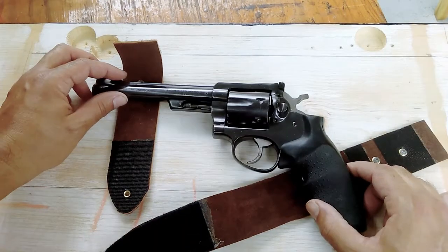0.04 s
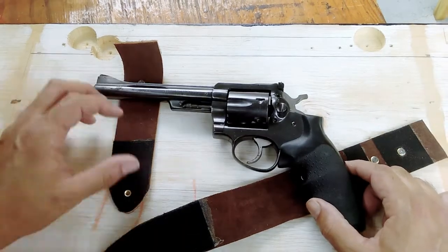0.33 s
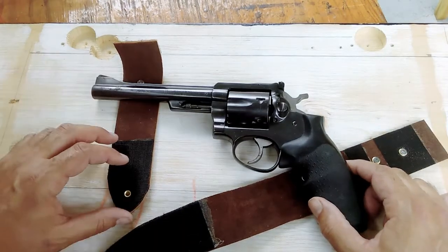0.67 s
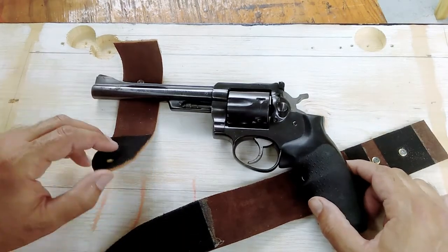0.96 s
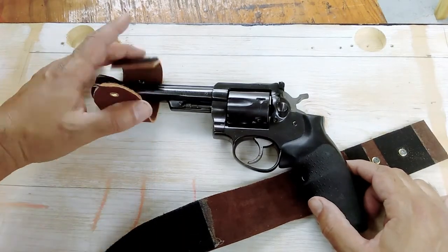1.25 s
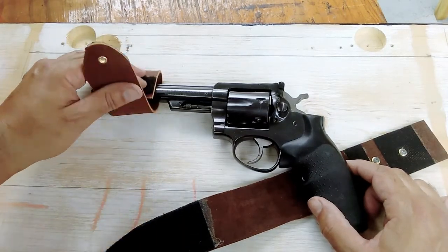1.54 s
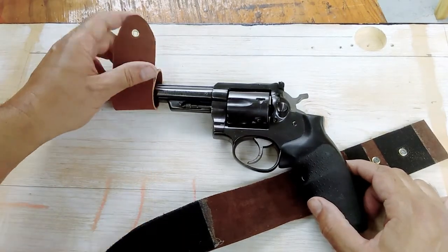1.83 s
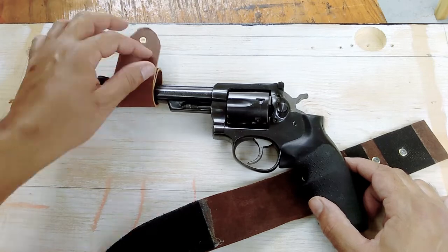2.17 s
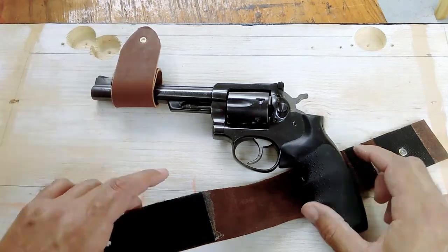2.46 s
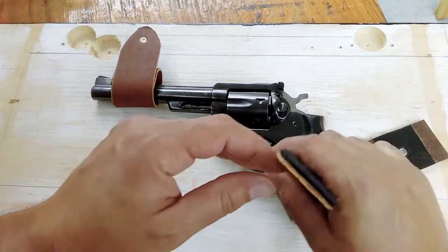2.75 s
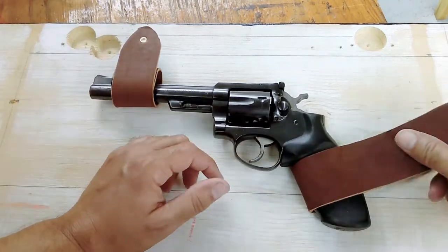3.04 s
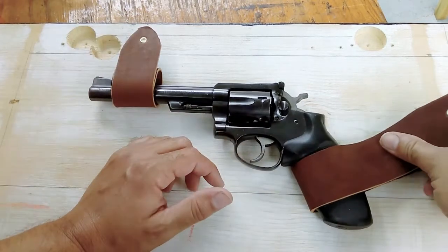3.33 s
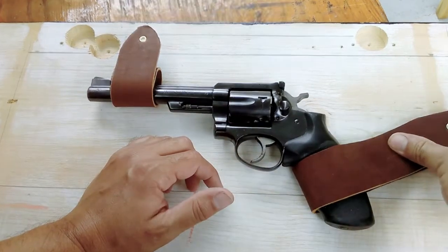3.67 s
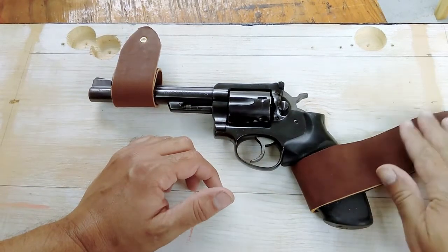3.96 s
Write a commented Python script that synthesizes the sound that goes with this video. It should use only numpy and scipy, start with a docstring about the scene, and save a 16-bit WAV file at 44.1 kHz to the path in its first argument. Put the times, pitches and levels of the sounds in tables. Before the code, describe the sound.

A metal revolver knocks lightly on a wooden board as leather straps rustle and tick.

```python
"""A quiet room, close up: hands wrap leather straps round a revolver lying on a wooden board.
The steel rocks and knocks, setting board and revolver ringing; the grip scuffs over the wood.
The leather taps on the grip, ticks as it bends and slides under the fingers in tiny catches.
Behind it are a low rumble, hiss, a late hum, a thin electrical whine and faint bird chirps far outside."""
import sys
import numpy as np
from scipy import signal
from scipy.fft import rfft, irfft
from scipy.io import wavfile
from scipy.ndimage import uniform_filter1d

SR = 44100
rng = np.random.default_rng(int(sys.argv[2]) if len(sys.argv) > 2 else 0)


def waveform_to_disk(signal):
    """Save audio, clipped to [-1, 1], as 16-bit WAV at the path in sys.argv[1]."""
    frames = np.transpose(np.atleast_2d(signal))
    scaled = np.clip(frames, -1, 1) * 32767
    samples = np.round(scaled).astype(np.int16)
    wavfile.write(sys.argv[1], SR, samples)


N = 176400


def undb(db):
    """Decibels to gain."""
    return 10 ** (np.asarray(db) / 20)


def unit(x):
    """Scale to rms 1."""
    return x / np.sqrt(np.mean(x ** 2))


def fade(t60, seconds):
    """Exponential decay that loses 60 dB in t60 seconds."""
    return undb(-60 * np.arange(int(seconds * SR)) / SR / t60)


def add(out, at, sound):
    """Mix a sound into the track at a time in seconds."""
    i = max(int(at * SR), 0)
    out[i:i + len(sound)] += sound[:max(N - i, 0)]


def colour(x, points):
    """Minimum-phase EQ through (Hz, dB) points that keeps the power of white noise."""
    hz, db = np.array(points, float).T
    bin_hz = np.arange(N + 1) * SR / (2 * N)
    gain = unit(undb(np.interp(np.log(bin_hz + 1), np.log(hz), db)))
    cepstrum = irfft(np.log(gain))
    cepstrum[1:N] *= 2
    cepstrum[N + 1:] = 0
    return irfft(rfft(x, 2 * N) * np.exp(rfft(cepstrum)))[:N]


def burst(t60):
    """A dying puff of noise with an even spectrum; t60 sets its energy."""
    shape = fade(t60, .2)
    phase = np.angle(rfft(shape * rng.standard_normal(len(shape))))
    flat = irfft(np.exp(1j * phase), len(shape))
    return unit(flat * shape ** .2) * np.sqrt(np.mean(shape ** 2))


def echo(x, t60):
    """Diffuse reverb of gain 1."""
    tail = fade(t60, 1) * rng.standard_normal(SR)
    return signal.fftconvolve(x, tail / np.linalg.norm(tail))[:N]


def swells(rows):
    """Smooth rise and fall for each (middle, length, dB) row."""
    t = np.arange(N) / SR
    power = sum(undb(db) ** 2 * np.exp(-2 * (2 * (t - at) / length) ** 2) for at, length, db in rows)
    return np.sqrt(power)


def wander(per_s):
    """Random control of spread near 1 that glides to a new value per_s times a second."""
    steps = np.arange(N) / SR * per_s
    return np.interp(steps, np.arange(N // 100), rng.standard_normal(N // 100))


def grains(per_s, scatter_db=-.5):
    """Tiny clicks of uneven size at random times."""
    size = rng.standard_normal(N) * undb(scatter_db * np.minimum(rng.exponential(size=N), 4))
    return unit((rng.random(N) < per_s / SR) * size)


def room(hum_hz=58.5, hum_start_s=2.9, whine_hz=10093.5, ripple_hz=62.4, swing_hz=48):
    """Rumble and hiss, a low hum that sets in late, and a whine that trembles with the mains."""
    # Room tone EQ. Each row: frequency in Hz, relative level in dB.
    air_eq = [(18, 2.5), (32, -4), (55, -6), (82, -8), (120, -16.5), (160, -21.5), (310, -25), (420, -30),
              (560, -33), (780, -35), (1030, -32), (1300, -36.5), (2000, -40), (3000, -45.5), (4500, -49),
              (5400, -47), (6400, -42), (8000, -50.5), (10000, -51), (11800, -59)]
    t = np.arange(N) / SR
    air = colour(rng.standard_normal(N), air_eq) * undb(-29 + .35 * wander(per_s=11.4))
    hum_fade_in = np.clip((t - hum_start_s) / .1, 0, 1)
    hum = hum_fade_in * np.sin(2 * np.pi * hum_hz * t)
    ripple = 2 * np.pi * ripple_hz * t
    tremolo = 1 + .25 * np.cos(ripple)
    whine = tremolo * np.sin(2 * np.pi * whine_hz * t + swing_hz / ripple_hz * np.sin(ripple))
    return air + np.sqrt(2) * (undb(-36) * hum + undb(-65.5) * whine)


def bird():
    """Two falling slurs between two thin high notes; only their reverb reaches the room."""
    # Bird notes. Each row: start and length in seconds, first and last pitch in Hz, level in dB.
    notes = [(0.594, .034, 6370, 6400, -50), (.716, .075, 5500, 2740, -44.3),
             (0.911, .08, 6000, 2880, -42.3), (1.08, .035, 6550, 6590, -47)]
    song = np.zeros(N)
    for at, length, start_hz, end_hz, db in notes:
        progress = np.linspace(0, 1, int(length * SR))
        wobble = unit(uniform_filter1d(rng.standard_normal(N), size=60))[:len(progress)]
        glide = (1 - progress) ** 2.2 + .12 * (1 - progress) * wobble
        hz = end_hz + (start_hz - end_hz) * glide
        envelope = np.sqrt(np.abs(np.sin(np.pi * progress)))
        add(song, at, undb(db) * envelope * np.sin(2 * np.pi * np.cumsum(hz) / SR))
    return echo(song, t60=.35)


def hands():
    """Hands shift their weight and the board rumbles; the grip scuffs over the wood as it moves."""
    # Dull shoves and grainy scuffs. Each row: middle and length in seconds, level in dB.
    shoves = [(.77, 0.053, -43), (1.0, 0.15, -42), (2.25, 0.4, -44), (2.72, 0.5, -38), (3.29, 0.3, -36),
              (3.77, 0.31, -38.5)]
    scuffs = [(2.70, 0.12, -40), (3.29, 0.13, -45), (3.76, 0.21, -48)]
    # Their EQs. Each row: frequency in Hz, relative level in dB.
    shove_eq = [(30, 5.5), (70, -1), (120, -1), (170, -5.5), (280, -7.5), (450, -23.5), (1500, -41.5)]
    scuff_eq = [(70, -7), (130, 7), (330, 11), (560, -3), (800, -12), (1080, -8), (2000, -27)]
    rumble = colour(rng.standard_normal(N) * swells(shoves), shove_eq)
    return rumble + colour(grains(per_s=1100) * swells(scuffs), scuff_eq)


def leather_slides(grains_per_s=9000, catch_db=2.2):
    """Leather slides in a stream of tiny catches: a soft hiss, and a broad swish where fingers press."""
    # Finger strokes. Each row: middle and length in seconds, hiss and swish levels in dB.
    strokes = [(0.126, 0.14, -58, -71), (1.385, 0.063, -54, -60), (1.494, 0.071, -50.5, -57),
               (1.67, 0.24, -57.5, -70), (2.103, 0.11, -52, -50), (2.164, 0.067, -49, -52),
               (2.406, 0.077, -48, -50), (2.667, .016, -47.5, -52), (2.748, 0.18, -53.5, -59),
               (3.01, 0.19, -58, -60), (3.243, 0.27, -55, -55), (3.415, .17, -52.5, -69),
               (3.63, 0.15, -52, -56), (3.765, 0.055, -55, -50), (3.927, 0.26, -52, -54.5)]
    # EQs of the two layers. Each row: frequency in Hz, relative level in dB.
    hiss_eq = [(4300, -11), (5500, -1), (6500, 6), (7800, -2.5), (11500, -18)]
    swish_eq = [(300, 4), (2200, 4), (3800, -1), (7600, -2), (11500, -10.5)]
    catch = undb(catch_db * wander(per_s=67))  # the strap grabs and frees
    hiss_level = swells([(at, length, db) for at, length, db, _ in strokes])
    swish_level = swells([(at, length, db) for at, length, _, db in strokes])
    hiss = colour(grains(grains_per_s) * catch * hiss_level, hiss_eq)
    swish = colour(grains(grains_per_s) * catch * swish_level, swish_eq)
    return hiss + swish


def leather_taps_and_ticks():
    """Straps tap on the grip, which rings briefly, and tick sharply as they bend."""
    # Light taps. Each row: start in seconds, level in dB, ring pitch in Hz.
    tap_hits = [(0.523, -47, 2890), (2.4176, -39, 2740), (2.6160, -31, 2640), (2.6480, -35, 2950),
                (2.67, -32.5, 2630), (3.6186, -27, 1970)]
    # Bending ticks. Each row: start in seconds, level in dB, 60 dB decay time in seconds.
    tick_hits = [(2.3758, -25.5, 0.0046), (2.3812, -34.5, 0.01), (2.389, -33, 0.011), (2.416, -26, 0.014),
                 (2.4626, -35.5, 0.013), (2.617, -40, .015), (3.6195, -35, 0.0096), (3.8608, -31.5, 0.0086),
                 (3.891, -39, 0.071), (3.9128, -18.5, 0.003), (3.921, -32, 0.02)]
    # Their EQs. Each row: frequency in Hz, relative level in dB.
    tap_eq = [(200, 8.5), (700, -8), (1100, 1), (1400, -3.5), (2200, -3), (3700, -10.5), (5800, -6.5),
              (8000, -12.5), (11500, -54)]
    tick_eq = [(300, -9), (2000, -18.5), (2800, -6), (4200, -9), (5300, -3.5), (6000, 1.5), (6900, 2),
               (7900, -6), (9000, -11.5), (11500, -16.5)]
    taps, grip, ticks = np.zeros((3, N))
    ring = undb(-4) * fade(t60=.022, seconds=.5)
    for at, db, hz in tap_hits:
        add(taps, at, undb(db) * burst(t60=.042))
        add(grip, at, undb(db) * ring * np.sin(2 * np.pi * hz * np.arange(len(ring)) / SR))
    for at, db, t60 in tick_hits:
        add(ticks, at, undb(db) * burst(t60))
    return colour(taps, tap_eq) + grip + colour(ticks, tick_eq)


def revolver_knocks(attack_s=.0013, spot_db=4, spot_octaves=.21, scatter_db=1.1, detune=.0061):
    """Steel meets wood: a short crack, then ringing modes whose balance depends on the spot struck."""
    # Knocks. Each row: start in seconds, ring and crack levels in dB, contact time in ms,
    # frequency in Hz that the spot favours.
    hits = [(0.201, -17.5, -24, .05, 360), (0.8075, -21, -31.5, .25, 530), (0.8990, -18, -30, .19, 360),
            (2.651, -30.5, -36, .4, 540), (2.6800, -16.5, -25, 0.51, 332), (2.7202, -34.5, -41, .9, 272),
            (2.7549, -18, -29.5, 0.5, 355), (2.796, -30.5, -46, 0.37, 1070)]
    # Modes of board and revolver. Each row: pitch in Hz, level in dB, 60 dB decay time in seconds.
    modes = [(250.4, -16, 0.13), (315, -15.5, 0.081), (362, -13, 0.083), (506, -17.5, 0.092),
             (543, -12, 0.067), (629, -19.5, 0.085), (1057, -12, 0.072), (1081, -6, 0.048),
             (1136, -7.5, 0.033), (1365, -11, 0.045), (1783, -12, 0.034), (1980, -21, 0.043),
             (2370, -17.5, 0.037), (2750, -17, 0.012), (3100, -26, 0.019)]
    # Crack EQ. Each row: frequency in Hz, relative level in dB.
    crack_eq = [(150, -7), (450, 8), (1100, -12), (2200, 1), (2900, 9.5), (3700, -7.5), (4500, 1),
                (5900, -1), (7500, -8.5), (11500, -29)]
    ring, crack = np.zeros((2, N))
    t = np.arange(SR // 2) / SR
    attack = 1 - np.exp(-t / attack_s)
    for at, ring_db, crack_db, contact_ms, spot_hz in hits:
        for hz, db, t60 in modes:
            size, shift = rng.standard_normal(2)
            lift_db = spot_db * np.exp(-(np.log2(hz / spot_hz) / spot_octaves) ** 2)
            dulling = np.hypot(1, hz * contact_ms / 1000)  # a longer, softer contact loses treble
            gain = undb(ring_db + db + lift_db + scatter_db * size) / dulling
            tone = np.sin(2 * np.pi * hz * (1 + detune * shift) * t)
            add(ring, at, gain * attack * fade(t60, .5) * tone)
        snap = burst(t60=.011)
        tail = undb(-14.5) * burst(t60=.06)
        add(crack, at, undb(crack_db) * (snap + tail))
    return ring + colour(crack, crack_eq)


def scene():
    """Close handling with a short reverb off the walls, over bird and room tone, in mono."""
    close = revolver_knocks() + leather_taps_and_ticks() + leather_slides() + hands()
    walls = undb(-10.5) * echo(close, t60=.14)
    return (close + walls + bird() + room())[None]


def record(dry, top_hz=11850):
    """A steep low-pass takes the top off the mix."""
    return signal.sosfilt(signal.ellip(10, .2, 80, top_hz, fs=SR, output="sos"), dry)


dry = scene()
out = record(dry)
waveform_to_disk(out)
```